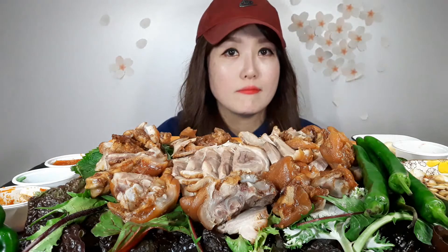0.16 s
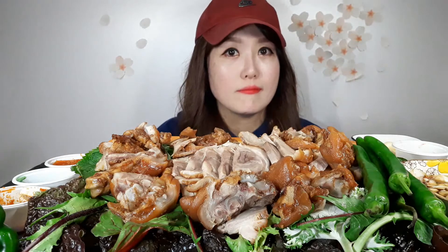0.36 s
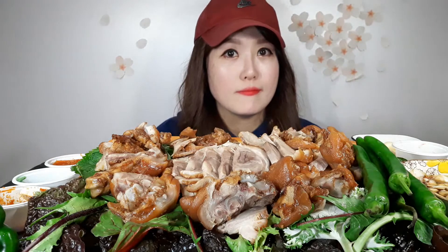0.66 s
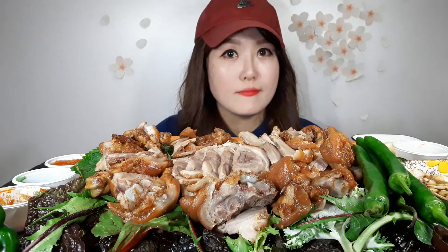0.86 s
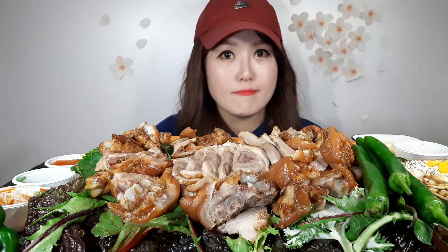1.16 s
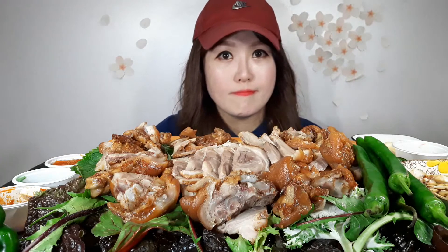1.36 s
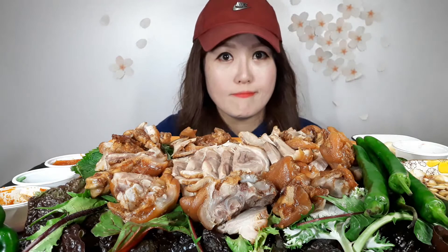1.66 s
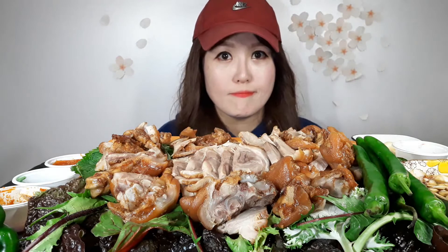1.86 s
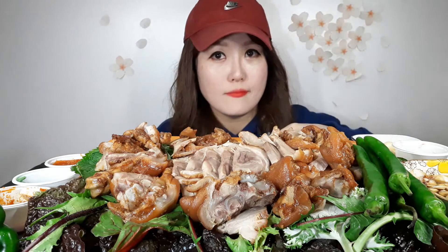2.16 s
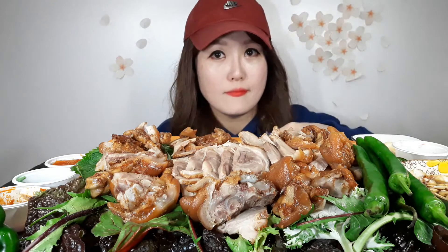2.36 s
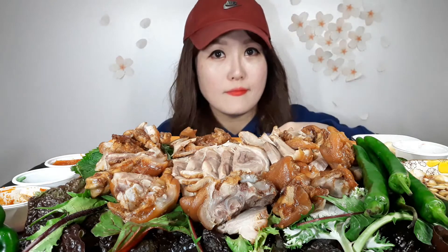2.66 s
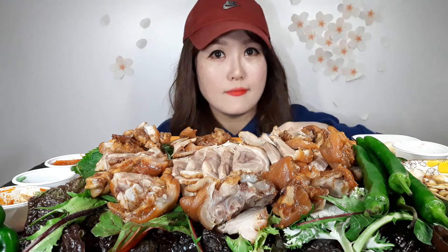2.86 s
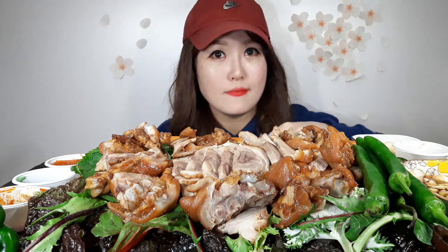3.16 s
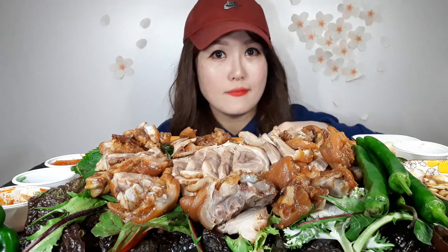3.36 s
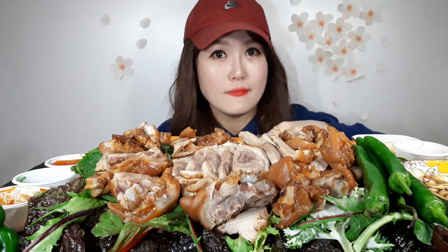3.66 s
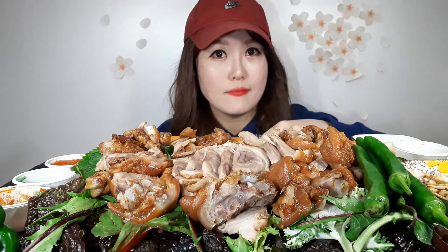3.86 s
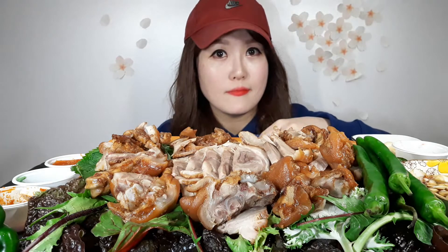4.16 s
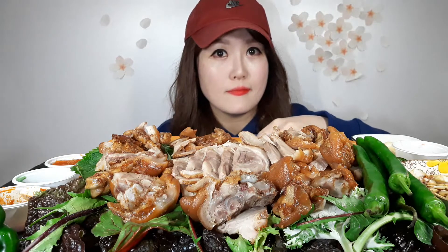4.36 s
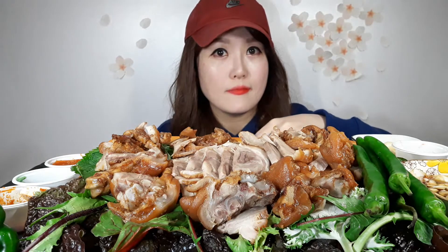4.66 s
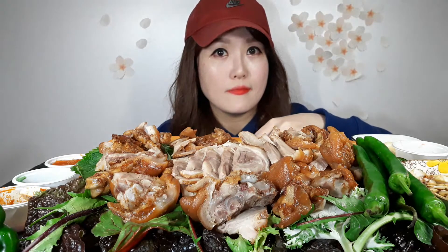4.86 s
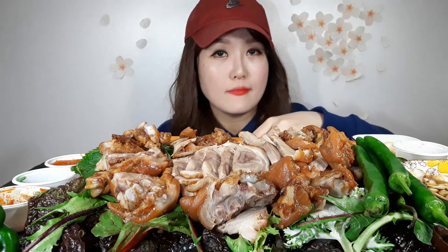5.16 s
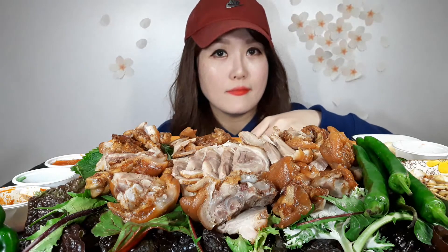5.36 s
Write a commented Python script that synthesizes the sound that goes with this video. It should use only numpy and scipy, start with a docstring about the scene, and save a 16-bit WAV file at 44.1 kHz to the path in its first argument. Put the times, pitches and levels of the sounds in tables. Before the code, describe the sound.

Close to one microphone in a small, quiet furnished room, a nail ticks and scrapes faintly on a can tab. A tiny gas leak leads to a sharp metallic crack and short tear. After a brief pause with a few finger clicks, soda pours into a glass, plopping and gulping over dense bright fizz that continues to the end.

```python
"""A faint hush and a fingernail ticking on the tab of a soda can come first, close to one microphone indoors.
Gas leaks out, then the lid cracks open and the can rings: short noise bursts shaped by its resonances.
The drink is poured into a glass and fizzes at once, made of random clicks coloured by foam, glass and air.
Big bubbles plop as short fading tones, and the air column rises in pitch as the glass fills.
Soft glugs join the pour, with the lowest ones near the end."""
import sys
import numpy as np
from scipy import signal
from scipy.io import wavfile
from scipy.ndimage import uniform_filter1d, minimum_filter1d

SR = 44100
rng = np.random.default_rng(int(sys.argv[2]) if len(sys.argv) > 2 else 0)


def digitize_waveform(pressure):
    """Quantize a signal to 16-bit integers and store it at the path in sys.argv[1].

    Rows of a 2-D input are taken as channels; values are limited to [-1, 1].
    """
    field = np.atleast_2d(pressure).T
    bounded = np.clip(field, -1, 1)
    quanta = np.round(bounded * 32767).astype(np.int16)
    wavfile.write(sys.argv[1], SR, quanta)


N = 242550
TIME = np.arange(N) / SR  # seconds


def amp(db):
    """Turns decibels into a gain."""
    return 10 ** (np.asarray(db) / 20)


def unit(x):
    """Scales a sound to an average (rms) strength of 1."""
    return x / np.sqrt(np.mean(x ** 2) + 1e-20)


def read(points, hz):
    """Reads a spectrum in dB from a table, joining its points on a log-frequency axis."""
    f, db = np.transpose(points)
    return np.interp(np.log(hz + 1), np.log(f), db)


def add(mix, s, sound):
    """Mixes a sound in at time s."""
    part = mix[round(s * SR):][:len(sound)]
    part += sound[:len(part)]


def causal(x, gain):
    """Minimum-phase filter (it never sounds early) of unit energy; gain is a function of Hz."""
    hz = abs(np.fft.fftfreq(4096, 1 / SR))
    log_gain = np.log(gain(hz) + 1e-6)
    spectrum = np.exp(signal.hilbert(log_gain).conj())
    taps = np.fft.ifft(spectrum).real[:2048]
    return signal.oaconvolve(x, taps / np.linalg.norm(taps))[:len(x)]


def colour(x, points):
    """Filters x with the spectrum shape of a table; only its level differences matter."""
    return causal(x, lambda hz: amp(read(points, hz)))


def ring(t, hz, t60, rise):
    """A tone that swells over about rise seconds and fades by 60 dB in t60 seconds."""
    return np.sin(2 * np.pi * hz * t) * amp(-60 * t / t60) * (1 - np.exp(-t / rise))


def resonate(x, hz, t60):
    """Lets x ring one mode whose pitch follows the curve hz; rms 1."""
    turn = np.exp(2j * np.pi * np.cumsum(hz) / SR)
    r = np.exp(-np.log(1000) / t60 / SR)
    # shift the moving pitch down to zero, smooth there, then shift back
    smooth = signal.lfilter([1 - r], [1, -r], x / turn)
    return unit((turn * smooth).real)


def clicks(per_s, spread_db, cap=3.2):
    """Random clicks, mostly small and a few large, at rms 1."""
    size = amp(spread_db * np.minimum(rng.exponential(1, N), cap))
    sign = rng.choice([-1, 1], N)
    return unit(size * sign * (rng.random(N) < per_s / SR))


def bursts(rows):
    """Stick and slip: each row (t/s, level/dB, length/s) is a brief noise burst with a quick fade."""
    force = np.zeros(N)
    for s, db, length in rows:
        u = np.arange(round(4 * length * SR)) / SR / length
        noise = rng.choice([-1, 1], SR)[:len(u)]
        add(force, s, amp(db) * noise * np.minimum(u * 6, 1) * np.exp(-u ** 2))
    return force


def waver(per_s, depth_db):
    """A random gain that changes about per_s times a second."""
    return amp(depth_db * np.interp(TIME * per_s, np.arange(N), rng.standard_normal(N)))


def swell(peak_s, db, rise_db_per_s, fall_db_per_s):
    """A gain that climbs to one peak and dies away."""
    return amp(db - np.maximum(rise_db_per_s * (peak_s - TIME), fall_db_per_s * (TIME - peak_s)))


# resonances of the can, relative to each other: f/Hz, width/Hz, level/dB
CAN_MODES = [(1593, 240, -2.5), (2360, 200, -2.5), (2826, 350, 2), (3620, 120, 0), (4400, 270, 2.5),
             (5240, 300, -0.5), (5810, 280, 6.5), (6490, 200, 1), (7147, 440, -12.5), (9310, 2000, -20.5)]


def can_body(x):
    """Passes x through the resonances of the can."""
    def gain(hz):
        power = sum(amp(db) ** 2 / (1 + (2 * (hz - f) / w) ** 2) ** 2 for f, w, db in CAN_MODES)
        return np.sqrt(power)
    return causal(x, gain)


def afterring(force, t60):
    """The many close modes of the can store the energy of each blow and let it die away."""
    r = np.exp(-2 * np.log(1000) / t60 / SR)
    energy = signal.lfilter([1 - r], [1, -r], force ** 2 + 1e-20)
    return can_body(rng.standard_normal(N) * np.sqrt(energy))


# tone of the room and microphone hush: f/Hz, level/dB
HUSH_COLOUR = [(30, -10), (75, 10), (200, -1.5), (650, -16), (1450, 9), (2100, 2.5), (3500, 1.5),
               (6500, 1.5), (9000, -4), (15500, -23.5)]


def hush(db=-72.5):
    """The faint, slightly wavering noise of the room and microphone."""
    return amp(db) * colour(rng.standard_normal(N), HUSH_COLOUR) * waver(per_s=11, depth_db=1.5)


# loudness of the hands on the can: t/s at the peak, level/dB, rise/(dB/s), fall/(dB/s)
HANDS_SWELL = (1.2, -64.5, 49, 31)
# tone of their soft rumble: f/Hz, level/dB
HANDS_COLOUR = [(20, -13.5), (55, 0), (130, -7), (220, -12.5), (600, -14), (1500, -24.5), (5000, -58.5)]


def hands():
    """Hands on the can give a soft rumble: low noise that swells and fades."""
    return colour(rng.standard_normal(N), HANDS_COLOUR) * swell(*HANDS_SWELL)


# tone of light touches on the metal, for creaks and ticks: f/Hz, level/dB
TICK_COLOUR = [(100, -26), (700, -27.5), (1400, 1.5), (2000, -4), (2700, 2.5), (3400, 2), (4800, -0.5),
               (6500, 5.5), (9000, -9), (16000, -34)]


def fidget(db=-69.5, peak_s=1.25, fade_db_per_s=10.5):
    """Tiny creaks of the can under the shifting grip, as sparse clicks."""
    creaks = colour(clicks(per_s=45, spread_db=5.0), TICK_COLOUR)
    return creaks * swell(peak_s, db, fade_db_per_s, fade_db_per_s)


# loudness of the drink shifting: t/s at the peak, level/dB, rise/(dB/s), fall/(dB/s)
TILT_SWELL = (1.87, -58.5, 260.5, 57)
# its tone: f/Hz, level/dB
TILT_COLOUR = [(60, -21), (300, -4), (800, 2), (1300, -5.5), (2800, -5), (7000, -12), (10000, -29.5),
               (16000, -31)]


def tilt():
    """The drink shifts in the tilted can: one swell of random clicks."""
    return colour(clicks(per_s=1100, spread_db=4), TILT_COLOUR) * swell(*TILT_SWELL)


# gas under the tab, a slow seep and one spurt: t/s at the peak, level/dB, rise/(dB/s), fall/(dB/s)
LEAK_SWELLS = [(1.17, -59, 28.5, 28), (1.154, -59, 144, 168)]
# tone of the hiss heard directly: f/Hz, level/dB
LEAK_COLOUR = [(100, -6), (900, -20), (1600, 3.5), (2000, -9.5), (3700, -7.5), (6500, -8), (9000, -14.5),
               (15500, -20.5)]


def leak(ring_db=-8.0, hiss_db=0.0):
    """Gas hisses out by the tab as dense clicks, heard directly and through the can."""
    flow = sum(swell(*row) for row in LEAK_SWELLS)
    gas = clicks(per_s=9000, spread_db=5.0) * flow * waver(per_s=33, depth_db=3.5)
    return amp(hiss_db) * colour(gas, LEAK_COLOUR) + amp(ring_db) * can_body(gas)


# touches of fingernail and fingers on the tab: t/s, level/dB before filtering, length/s
TICKS = [(0.297, -46, 0.016), (0.308, -32.5, 0.012), (.3625, -37.5, 0.0013), (0.403, -42, 0.0026),
         (.416, -42.5, 0.0023), (0.478, -44.5, 0.00349), (0.734, -46.5, 0.0088), (0.766, -41.5, 0.021),
         (1.016, -40.5, .0039), (1.143, -39.5, .003), (1.487, -39, 0.0044), (1.5085, -27, 0.0019),
         (1.659, -48, 0.019)]
# the thin wall flexes under the fingers: t/s, level/dB, f/Hz
DENTS = [(.128, -48, 1250), (1.509, -36.5, 1220), (1.553, -46, 1590)]


def fingers(tick_db=-4.0, scrape_db=-3.5, dull_hz=4900.0, tail_db=-14.0, t60=0.12, dent_db=0.0):
    """Dry ticks of the nail on the tab, duller scrapes of the fingertip, and blips of the flexing wall."""
    t = np.arange(SR // 10) / SR
    longest_tick = .0035  # s
    ticks = bursts([row for row in TICKS if row[2] < longest_tick])
    scrapes = bursts([row for row in TICKS if row[2] >= longest_tick])
    # a longer, softer touch has less treble
    scrapes = signal.lfilter(*signal.butter(2, dull_hz, fs=SR), scrapes)
    out = colour(amp(tick_db) * ticks + amp(scrape_db) * scrapes, TICK_COLOUR)
    out += amp(tail_db) * afterring(ticks + scrapes, t60)
    for s, db, hz in DENTS:
        add(out, s, amp(db + dent_db) * ring(t, hz, t60=0.015, rise=0.00029))
    return out


# the score starts to give, the seal pops, the flap breaks inwards: t/s, level/dB before filtering, length/s
CRACKS = [(1.2828, -22, 0.0018), (1.2845, 4, .002), (1.2962, -2.5, 0.0017)]
# tone of the metal snap heard directly: f/Hz, level/dB
SNAP_COLOUR = [(40, -31), (100, -11.5), (280, -13.5), (1000, -20.5), (1600, -8.5), (4500, 3.5), (6300, 3),
               (8000, -15), (11000, -15.5), (16000, -23.5)]
# the score then tears on in ever weaker jerks
TEAR_START_S, TEAR_STEP_S, JERK_S, TEAR_DB, TEAR_FADE_DB_PER_S = 1.3045, .005, 0.0034, -9.5, 400


def lid(snap_db=-3.5, body_db=-6.5, tail_db=-11.0, t60=0.2, thin_hz=850.0, dull_hz=7000.0,
        thump_db=-32.0, thump_hz=105.0, count=5):
    """The lid cracks and tears open, heard directly and through the can, which thumps softly in the hand."""
    pop = bursts(CRACKS[:-1])
    steps = TEAR_STEP_S * np.arange(count)
    jerks = [(TEAR_START_S + s, TEAR_DB - TEAR_FADE_DB_PER_S * s, JERK_S) for s in steps]
    # slack metal is thinner and duller than the taut seal
    slack = signal.butter(2, [thin_hz, dull_hz], "band", fs=SR)
    tear = signal.lfilter(*slack, bursts(CRACKS[-1:] + jerks))
    force = pop + tear
    out = amp(snap_db) * colour(force, SNAP_COLOUR)
    out += amp(body_db) * can_body(force) + amp(tail_db) * afterring(force, t60)
    thump = ring(np.arange(SR // 5) / SR, thump_hz, t60=.07, rise=.002)
    add(out, CRACKS[1][0], amp(thump_db) * thump)
    return out


POUR_START = 2.1  # s


def poured(s):
    """Seconds of pouring up to time s."""
    return np.maximum(s - POUR_START, 0)


def filling(db, growth_db_per_s, build_s):
    """A gain that builds up once the stream lands and keeps growing with the foam."""
    return amp(db + growth_db_per_s * poured(TIME)) * (1 - np.exp(-(poured(TIME) / build_s) ** 2))


# the can gulps air early in the pour and the stream lands unevenly: start t/s, end t/s, edge/s
GULPING = (2.39, 3.36, 0.05)


def gulping():
    """Near 1 while the can gulps air, near 0 while it runs smoothly."""
    start, end, edge = GULPING
    return .5 * (np.tanh((TIME - start) / edge) - np.tanh((TIME - end) / edge))


# the bubbly drink has a soft note that sinks as it fills with gas; it is halfway down after FOAM_SINK_S
FOAM_FIRST_HZ, FOAM_LAST_HZ, FOAM_SINK_S = 810, 222, 0.84


def foam_note(s):
    """Pitch of the bubbly drink at time s, sinking towards its last value."""
    return FOAM_LAST_HZ + (FOAM_FIRST_HZ - FOAM_LAST_HZ) / (1 + (poured(s) / FOAM_SINK_S) ** 2)


# hollow note of the glass: t/s, f/Hz
GLASS_NOTE = [(2.1, 653), (3.1, 616), (3.7, 661), (5.5, 674)]


def glass_note(s):
    """Pitch of the glass at time s."""
    return np.interp(s, *np.transpose(GLASS_NOTE))


# tone of the low rumble in the glass: f/Hz, level/dB
RUMBLE_COLOUR = [(20, -30), (55, 10), (110, 6), (250, -21), (500, 3), (2000, -32)]


def rumble(gulp_db=-59.5, brim_db=-46.5, brim_db_per_s=17.5):
    """The low rumble of the stirred drink, which swells as the glass gets full."""
    stir = clicks(per_s=350, spread_db=4.5) * waver(per_s=16, depth_db=5.0)
    stir = unit(colour(stir, RUMBLE_COLOUR))
    brim = amp(brim_db - brim_db_per_s * (N / SR - TIME))
    return stir * (filling(db=-72.0, growth_db_per_s=1.2, build_s=0.13) + amp(gulp_db) * gulping() + brim)


def churn(gulp_db=-43.5):
    """The stream stirs the foam in lumpy pulses, hardest while the can gulps."""
    stir = clicks(per_s=280, spread_db=2.0) * waver(per_s=16, depth_db=4.5)
    note = resonate(stir, foam_note(TIME), t60=0.015)
    note = resonate(note, foam_note(TIME), t60=0.0052)
    return note * (filling(db=-55.5, growth_db_per_s=2.5, build_s=0.15) + amp(gulp_db) * gulping())


def froth(t60=0.029):
    """Middling bubbles keep the hollow note of the glass ringing."""
    bubbles = clicks(per_s=700, spread_db=2.5) * waver(per_s=22, depth_db=1.9)
    note = resonate(bubbles, glass_note(TIME), t60)
    note = resonate(note, glass_note(TIME), t60=0.0061)
    return note * filling(db=-41.0, growth_db_per_s=2.5, build_s=0.074)


# tone of the fizz on bare glass: f/Hz, level/dB
FIZZ_EMPTY = [(60, -11), (300, -17), (700, 1), (1200, -7), (2000, -1), (3000, -2.5), (4000, -4), (5000, 1),
              (6800, 4), (7700, -1), (8600, -9), (11000, -16.5), (15500, -29)]
# tone of the fizz under a head of foam: f/Hz, level/dB
FIZZ_FULL = [(60, -28), (300, -9), (700, 4.5), (1200, -3), (2000, 0), (3000, 1.5), (4000, 1.5), (5000, 1.5),
             (6200, 4.5), (7700, -1), (8800, -4), (11000, -13.5), (15500, -28)]
# air column over the drink: empty f/Hz, full f/Hz, width/Hz, empty lift level/dB, full lift level/dB
AIR_COLUMN = [(1556, 2060, 396, 18.5, 5), (2430, 3140, 240, 10, -4.5)]
# steady rings of the glass wall: f/Hz, width/Hz, lift level/dB
WALL = [(2740, 150, 5), (3400, 280, 5), (4330, 240, 3), (4800, 160, 2), (5920, 180, 3), (6800, 200, 3)]


def fizz(db=-33.0, rise_db=5.5, half_s=2.02, turn_s=0.42, foam_s=1.7):
    """Thousands of tiny bursts, coloured by shrinking air column and growing foam; louder near the rim."""
    hz, t, z = signal.stft(clicks(per_s=9000, spread_db=3.5), SR, nperseg=512)
    hz = hz[:, None]
    fill = np.clip((t - POUR_START) / (N / SR - POUR_START), 0, 1) ** 0.8
    foam = np.clip((t - POUR_START) / foam_s, 0, 1)
    field_db = (1 - foam) * read(FIZZ_EMPTY, hz) + foam * read(FIZZ_FULL, hz)
    for empty, full, width, first_db, last_db in AIR_COLUMN:
        centre = 1 / ((1 - fill) / empty + fill / full)  # pitch goes as one over the length of air
        lift_db = first_db + fill * (last_db - first_db)
        field_db = field_db + lift_db / (1 + (2 * (hz - centre) / width) ** 2)
    for f, width, lift_db in WALL:
        field_db = field_db + lift_db / (1 + (2 * (hz - f) / width) ** 2)
    hiss = unit(signal.istft(z * amp(field_db), SR, nperseg=512)[1][:N])
    head = 1 / (1 + np.exp((half_s - poured(TIME)) / turn_s))  # foam nearing the rim, 0 to 1
    return amp(db + rise_db * head) * hiss * waver(per_s=70, depth_db=1.0)


# gulps of air carried under the surface: t/s at the middle, level/dB, f/Hz
GLUGS = [(2.997, -17.5, 425), (3.256, -25, 422), (3.336, -30, 443), (4.715, -27, 330), (4.836, -25, 172),
         (4.936, -25.5, 182), (4.966, -23.5, 400), (5.087, -32, 270), (5.19, -27, 267), (5.295, -31.5, 135),
         (5.363, -33, 150), (5.442, -33, 117), (5.481, -28, 119)]


def glugs(db=0.0, cycles=0.54, glide=0.065):
    """Large pockets of air give a soft low pulse, a cycle or two long and rising in pitch."""
    out, t = np.zeros(N), np.arange(-SR // 25, SR // 25) / SR
    for s, peak_db, hz in GLUGS:
        u = hz * t  # time counted in cycles
        pulse = np.exp(-(u / cycles) ** 2) * np.sin(2 * np.pi * (u + glide * u ** 2 / 2))
        add(out, s + t[0], amp(peak_db + db) * pulse)
    return out


# small sharp bursts: t/s, level/dB before the shared gain, f/Hz, t60/s
SNAPS = [(2.631, -12, 6650, 0.0044), (3.015, -15, 5670, 0.0065), (3.0665, -19, 7050, 0.0073),
         (3.1235, -10.5, 6600, .005), (3.5769, -17.5, 8130, 0.014), (3.5782, -21.5, 5200, 0.024),
         (4.9345, -8, 5840, .003), (5.0097, -10.5, 5640, 0.0081), (5.0316, -11, 3980, 0.011),
         (5.0801, -5, 6040, .0074)]


def snaps(db=2.0, crackle=0.57):
    """Small bubbles burst with a short, rough, high ping."""
    out, t = np.zeros(N), np.arange(SR // 20) / SR
    for s, peak_db, hz, t60 in SNAPS:
        rough = 1 + crackle * unit(uniform_filter1d(rng.standard_normal(len(t)), size=10))
        add(out, s, amp(peak_db + db) * rough * ring(t, hz, t60, rise=0.00023))
    return out


def small_plops(first_s, last_s, db, column_db, splash_db, spread_db=3.0, count=8):
    """Weak bubbles at loosely even intervals, as rows like those of PLOPS."""
    chance = rng.uniform(-1, 1, (count, 4))
    place = np.arange(count) + .5 + .5 * chance[:, 0]
    times = first_s + (last_s - first_s) * place / count
    levels = np.array([db, column_db, splash_db]) + spread_db * chance[:, 1:]
    return list(np.column_stack([times, levels]))


# big bubbles bursting, before the gain of each part: t/s, plop level/dB, air column level/dB, splash level/dB
PLOPS = [(2.2888, -20, -30, -42), (2.3715, -22.5, -21.5, -28), (2.4628, -8.5, -12.5, -24),
         (2.5423, -13, -22, -25.5), (2.5643, -10, -18.5, -22), (2.6325, -17.5, -40, -25),
         (2.6843, -11, -30, -24), (2.721, -4, -12, -18.5), (2.828, -4, -13.5, -11.5),
         (2.9105, -13, -29, -19), (2.923, -12, -22, -11), (2.961, -11.5, -22, -13.5),
         (2.995, -2, -19.5, -26), (3.0405, -12.5, -34, -28), (3.0876, -18.5, -22.5, -35),
         (3.158, -15, -21, -26), (3.2537, -8.5, -24, -25), (3.2642, -11.5, -15, -17),
         (3.3325, -19, -22, -23.5), (3.4853, -24, -22, -25), (4.2648, -15, -23, -21),
         (4.7691, -20, -26, -32), (4.8359, -14.5, -32, -24), (4.8458, -19.5, -38, -23),
         (5.0845, -17, -29, -28), (5.1893, -7, -27, -32)]
# tone of the wet splash: f/Hz, level/dB
SPLASH_COLOUR = [(200, -9.5), (1000, 3.5), (3500, -12.5), (5000, 4), (6500, 7), (8500, -9.5), (15000, -28)]


def plops(plop_db=4.0, foam_db=0.0, column_db=4.5, splash_db=0.0, slap_db=-4.5, slap_hz=970.0,
          t60=0.032, scatter=0.077, cut_hz=202.0):
    """A bubble bursts: a slap and a wet splash, then the foam, the glass and its air column ring briefly."""
    out, sprays, t = np.zeros(N), np.zeros(N), np.arange(SR // 10) / SR
    early = small_plops(2.48, 3.1, db=-24.5, column_db=-30.0, splash_db=-27.5, count=14)
    late = small_plops(4.62, 5.45, db=-23.0, column_db=-24.0, splash_db=-23.0, count=9)
    for s, low_db, mid_db, high_db in PLOPS + early + late:
        size = 1 + scatter * rng.uniform(-1.04, 1, 2)  # no two bubbles sound quite the same note
        glass = ring(t, size[0] * glass_note(s), t60, rise=0.0013)
        foam = ring(t, size[1] ** 2 * foam_note(s), t60=0.013, rise=0.00085)
        # only big bubbles slap hard
        slap = amp(low_db / 2) * ring(t, size[1] * slap_hz, t60=0.0048, rise=0.00035)
        # coupled modes swing against each other, hence the minus signs
        plop = amp(plop_db) * glass - amp(foam_db) * foam - amp(slap_db) * slap
        add(out, s, amp(low_db) * plop)
        air_hz = np.interp(s, [POUR_START, N / SR], AIR_COLUMN[0][:2])
        air = ring(t, air_hz, t60=0.016, rise=0.00065)
        air += .5 * ring(t, air_hz * 1.6, t60=0.0076, rise=0.00027)
        add(out, s, amp(mid_db + column_db) * air)
        fade = np.exp(-t / 0.00073) + 0.4 * np.exp(-t / 0.0052)
        spray = rng.choice([-1, 1], len(t)) * fade * np.minimum(t / 0.00018, 1)
        add(sprays, s, amp(high_db + splash_db) * spray)
    out += colour(sprays, SPLASH_COLOUR)
    # the plops have little bass: cut below cut_hz
    return signal.sosfilt(signal.butter(2, cut_hz, "high", fs=SR, output="sos"), out)


def room(x, db=-21.0, t60=0.15):
    """The faint, short tail of a small furnished room, as fading noise echoes."""
    t = np.arange(SR // 2) / SR
    decay = amp(-60 * t / t60)
    taps = rng.standard_normal(len(t)) * decay * (t > .004)
    return x + amp(db) * signal.oaconvolve(x, taps / np.linalg.norm(taps))[:N]


def scene():
    """Can, then pour; one microphone feeds both channels."""
    can = hush() + hands() + fidget() + tilt() + leak() + fingers() + lid()
    pouring = np.clip((TIME - POUR_START) / 0.001, 0, 1)
    drink = pouring * (rumble() + churn() + froth() + fizz()) + glugs() + snaps() + plops()
    return np.tile(room(can + drink), (2, 1))


EDGE_HZ = 15950  # upper band limit


def record(dry):
    """A fast limiter holds the loudest peaks under full scale; then the treble above EDGE_HZ is cut."""
    gain = .97 / np.maximum(abs(dry[0]), .97)
    limited = dry * uniform_filter1d(minimum_filter1d(gain, size=45), size=45)
    low_pass = signal.firwin(511, EDGE_HZ, window=("kaiser", 9), fs=SR)
    return signal.oaconvolve(limited, low_pass[None], "same")


dry = scene()
out = record(dry)
digitize_waveform(out)
```